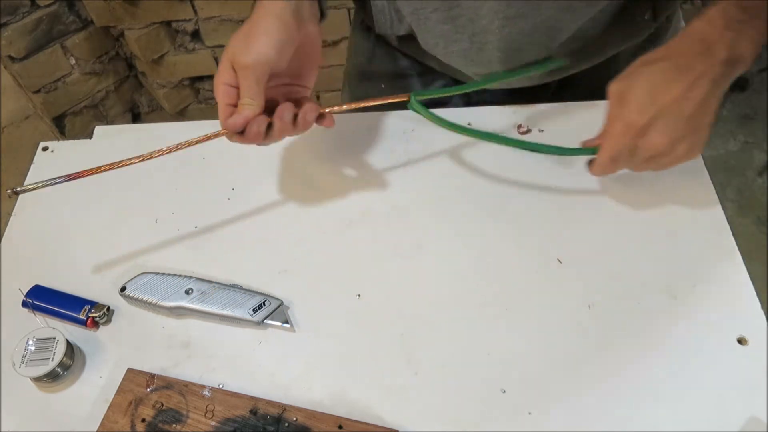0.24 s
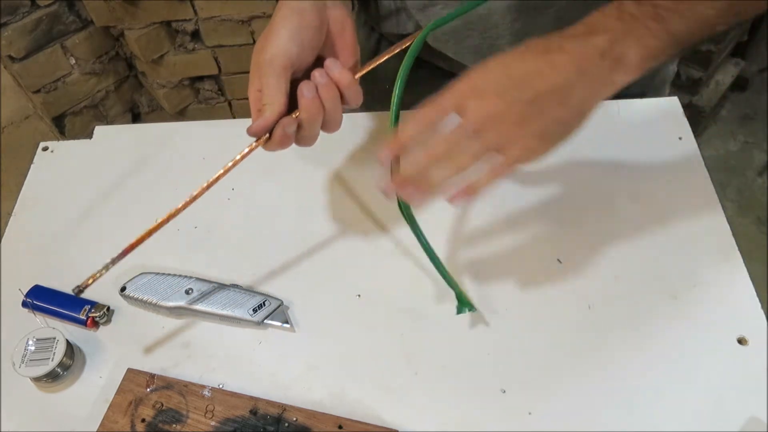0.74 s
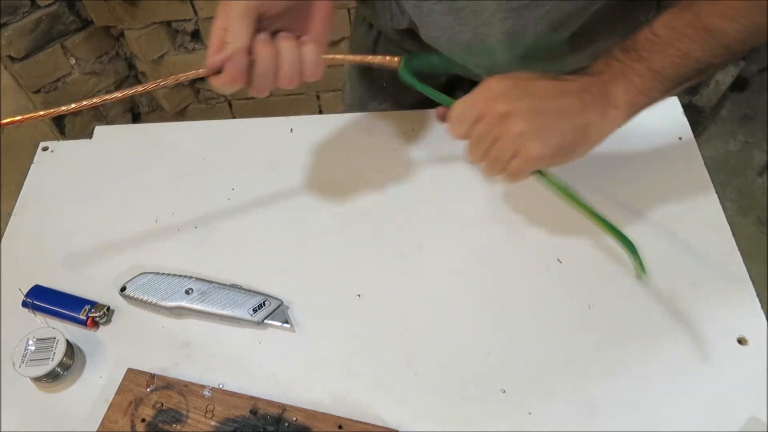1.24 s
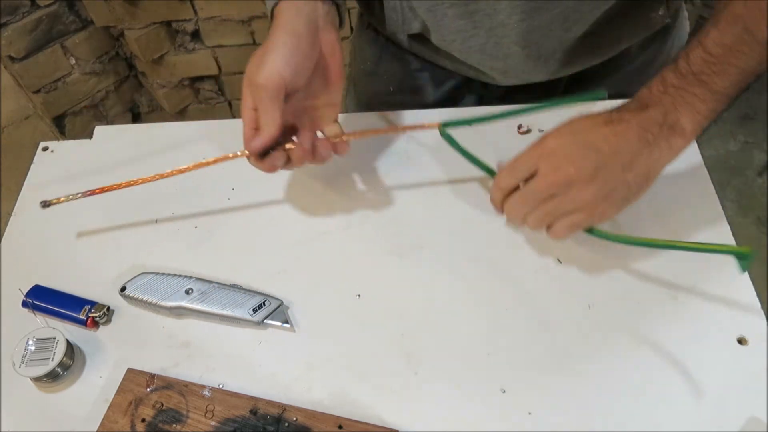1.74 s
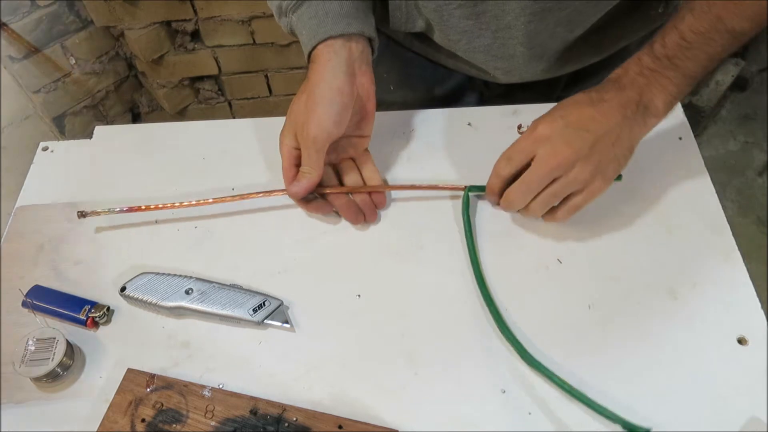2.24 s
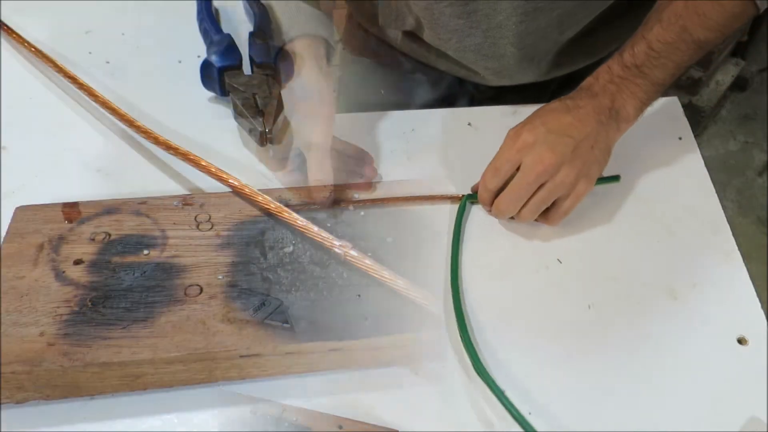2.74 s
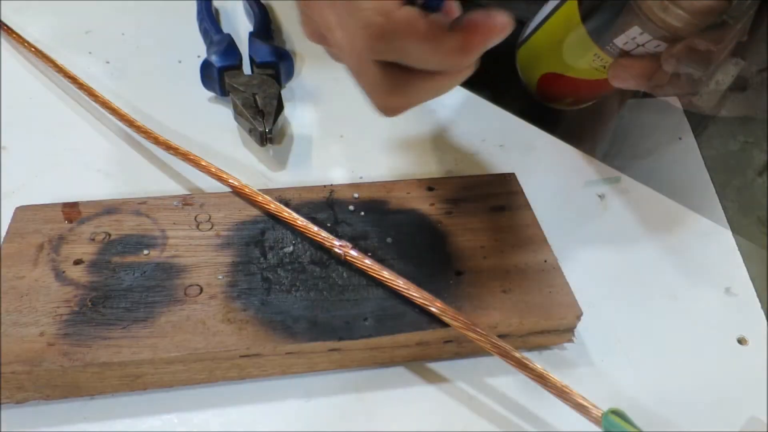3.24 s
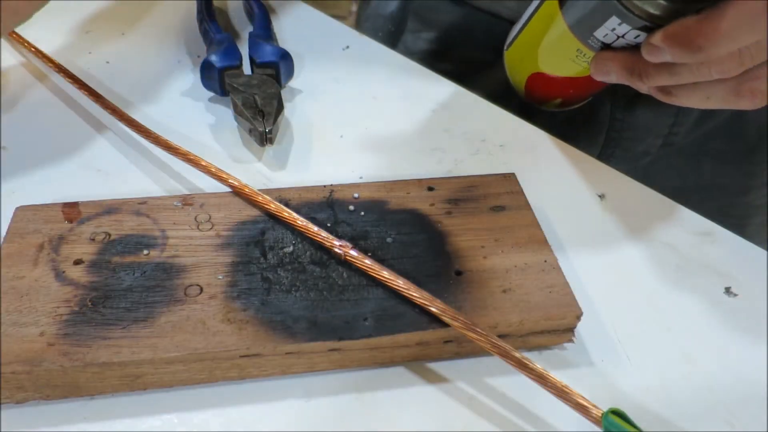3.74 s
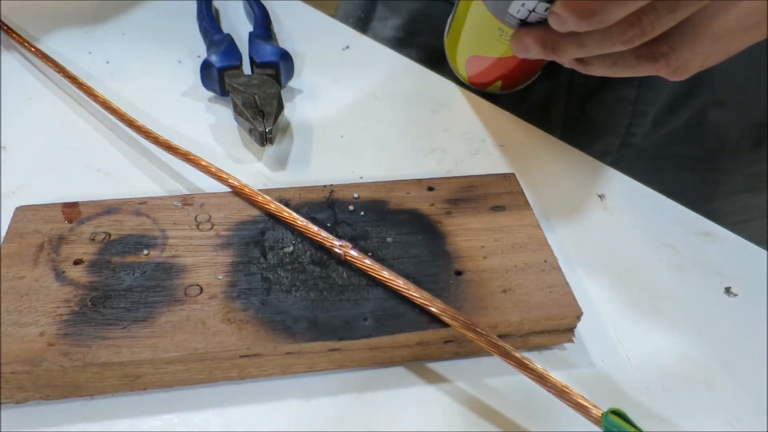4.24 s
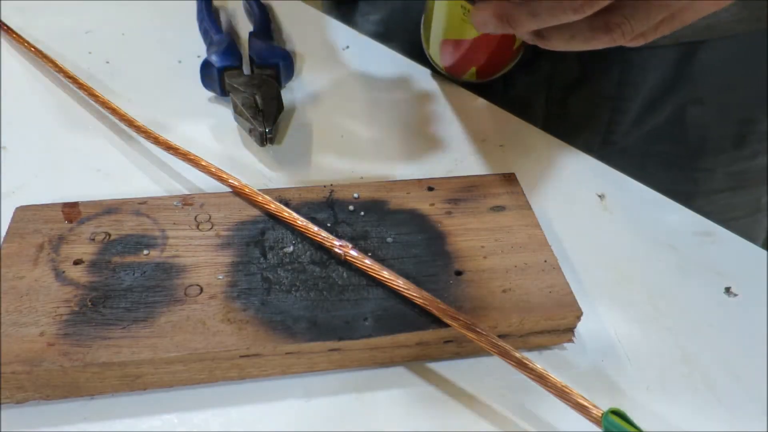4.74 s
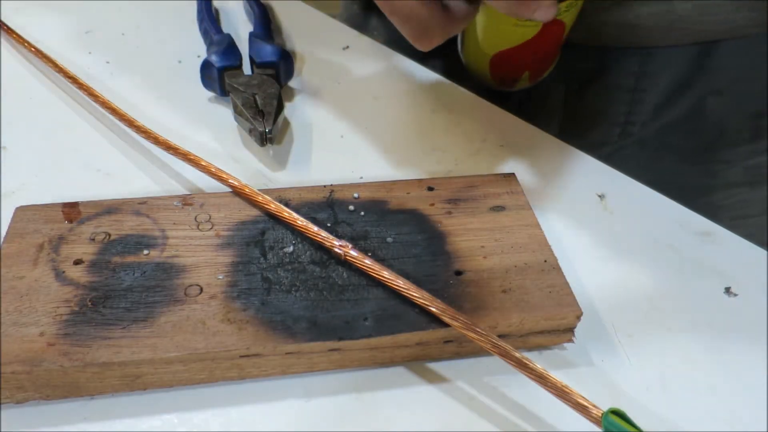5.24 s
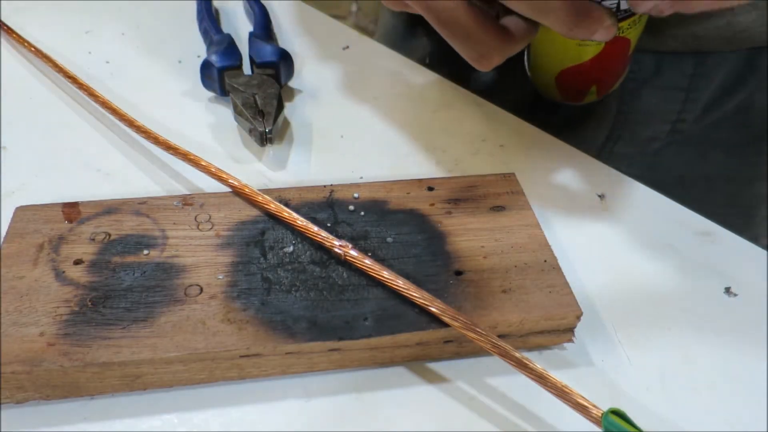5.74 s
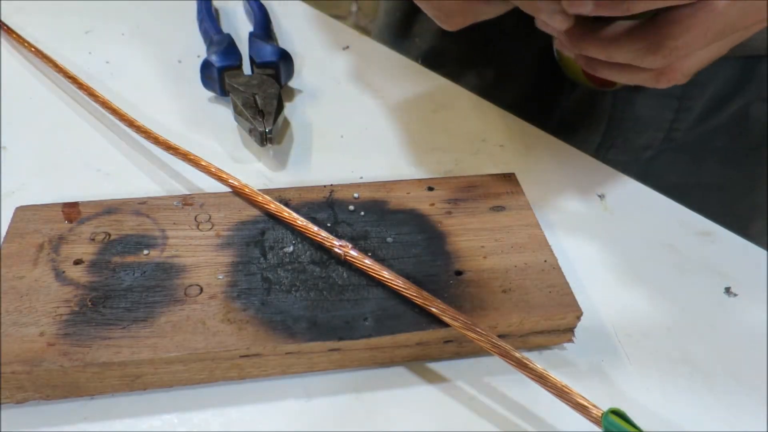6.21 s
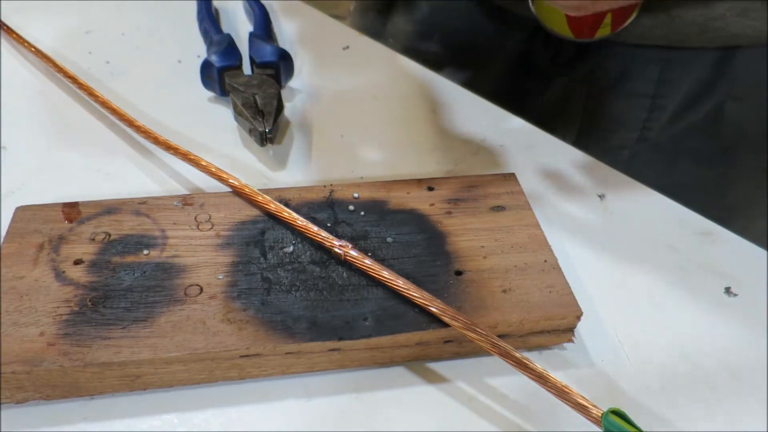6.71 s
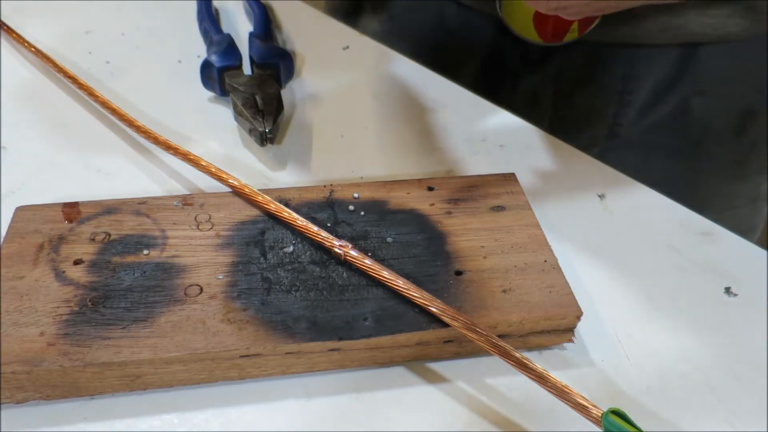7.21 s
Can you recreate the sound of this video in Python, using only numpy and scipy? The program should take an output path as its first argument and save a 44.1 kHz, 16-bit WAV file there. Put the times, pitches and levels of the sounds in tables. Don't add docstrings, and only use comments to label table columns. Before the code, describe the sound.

Plastic sheath cracks and snaps off copper cable, then a valve clicks, a flint wheel rasps, and a small gas torch roars steadily.

```python
import sys
import numpy as np
from scipy import signal
from scipy.fft import rfft, irfft, next_fast_len
from scipy.io import wavfile
from scipy.ndimage import map_coordinates

SR = 44100
rng = np.random.default_rng(int(sys.argv[2]) if len(sys.argv) > 2 else 0)


def invert_db(level):
    return 10 ** (np.asarray(level, dtype=float) / 20)


def unload_audio(sound):
    columns = np.transpose(np.atleast_2d(sound))
    steps = np.round(np.clip(columns, -1, 1) * 32767)
    wavfile.write(sys.argv[1], SR, steps.astype(np.int16))


N = 329427
T = np.arange(N) / SR
PAD = next_fast_len(N + SR // 4)
HZ = np.maximum(np.arange(PAD // 2 + 1) * SR / PAD, 1)


def rms_one(x):
    return x / np.sqrt(np.mean(x ** 2) + 1e-20)


def at_hz(points):
    hz, db = np.array(points).T
    return np.interp(np.log(HZ), np.log(hz), db)


def faded_gain(rows, fade_s):
    s, db = np.transpose(rows)
    gate = np.clip(np.minimum(T - s[0], s[-1] - T) / fade_s + 1, 0, 1)
    return gate * invert_db(np.interp(T, s, db))


def opens(s, fade_s):
    return np.clip((T - s) / fade_s + 1, 0, 1)


def filtered(x, order, hz, kind):
    return signal.sosfilt(signal.butter(order, hz, kind, fs=SR, output="sos"), x)


def colour(x, db):
    cepstrum = irfft(db * np.log(10) / 20, PAD)
    cepstrum[1:PAD // 2] *= 2
    cepstrum[PAD // 2 + 1:] = 0
    return irfft(rfft(x, PAD) * np.exp(rfft(cepstrum)), PAD)[..., :N]


def lifts(peaks):
    return sum(db / (1 + (2 * (HZ - hz) / width) ** 2) for hz, width, db in peaks)


def drift(rate_hz):
    r = np.exp(-2 * np.pi * rate_hz / SR)
    return rms_one(signal.lfilter([1], [1, -2 * r, r * r], rng.standard_normal(N + SR))[SR:])


def grains(per_s, spread_db):
    born = rng.random(N) < per_s / SR
    pulses = born * invert_db(spread_db * np.minimum(rng.exponential(1, N), 4))
    return pulses - pulses.mean()


def lean_in(x, samples):
    turn = np.exp(1j * np.pi * samples * HZ / SR * np.array([[1], [-1]]))
    return irfft(rfft(x, PAD) * turn, PAD)[:, :N]


# f/Hz, level/dB
PORT_WIDTH = [(25, -27), (60, -18), (110, -17), (200, -7), (380, -8), (700, -10), (1290, -13.5),
              (2380, -20.5), (4400, -17.5), (8120, -16.5), (15000, -14)]


def spread(mid, side, wide_db):
    side = colour(side, at_hz(PORT_WIDTH) + wide_db)
    return np.array([mid + side, mid - side])


def hiss(db, wide_db, flicker_db, rate_hz):
    shapes = invert_db(np.array([db, db + at_hz(PORT_WIDTH) + wide_db]))
    mid, side = irfft(rfft(rng.standard_normal((2, PAD))) * shapes, PAD)[:, :N]
    return rms_one(np.array([mid + side, mid - side]) * invert_db(flicker_db * drift(rate_hz)))


def clicks(events, spectrum, t60_s, room_db, ring_db, sharpness, wide, echo_s, echo_db, edge=3.03, hold_s=0):
    dry, wet, t = np.zeros((2, N)), np.zeros(N), np.arange(2000) / SR
    body = colour(np.eye(1, N)[0], at_hz(spectrum))[:600]
    lag = int(echo_s * SR)
    t60s = np.broadcast_to(t60_s, len(events))
    rooms_db = np.broadcast_to(room_db, len(events))
    for (s, db, hz, pan_db, *_), t60, wet_db in zip(events, t60s, rooms_db):
        crack = rng.standard_normal((2, len(t)))
        crack[:, 0] += edge
        burst = crack * invert_db(-60 * np.maximum(t - hold_s, 0) / t60)
        burst[:, lag:] += invert_db(echo_db) * crack[::-1, lag:] * invert_db(-60 * t[:-lag] / t60)
        ringing = signal.lfilter(*signal.iirpeak(min(hz, 15000), sharpness, fs=SR), burst)
        mid, side = signal.fftconvolve(burst + invert_db(ring_db) * ringing, body[None])[:, :len(t)]
        size = invert_db(db) / np.abs(mid).max()
        pan = invert_db(np.array([[pan_db / 2], [-pan_db / 2]]))
        i = round((s + 0.0007) * SR)
        dry[:, i:i + len(t)] += size * (mid + wide * side * [[1], [-1]]) * pan
        same_energy = np.linalg.norm(mid) / np.linalg.norm(body)
        wet[i:i + len(body)] += size * invert_db(wet_db) * body * same_energy
    return dry, wet


# t/s, depth/dB, sink time/s
DUCKS = [
    (-0.3, 9, .01),
    (0.12, 20.5, 0.2),
    (1.304, 21, 0.019),
    (3.951, 13, .005),
    (3.984, 27.5, 0.0056),
]
GAIN_HOLD_S, GAIN_RECOVERY_S = 0.14, 1.03
OVERSHOOT_DB, OVERSHOOT_S = 4, 0.025


def gain_control():
    pulls = []
    for s, depth_db, sink_s in DUCKS:
        since = np.maximum(T - s - sink_s, 0)
        settled = depth_db * np.exp(-np.maximum(since - GAIN_HOLD_S, 0) / GAIN_RECOVERY_S)
        overshoot = OVERSHOOT_DB * np.exp(-since / OVERSHOOT_S)
        pulls.append(np.clip((T - s) / sink_s, 0, 1) * (settled + overshoot))
    return -np.max(pulls, axis=0)


# f/Hz, level/dB per Hz
AIR_COLOUR = [(18, -45), (30, -19), (93, -6), (179, -11), (280, -9.5), (364, -10), (415, -12),
              (1010, -14.5), (2230, -15.5), (16000, -28.5)]
AIR_DB = -41


def air():
    return invert_db(AIR_DB + gain_control()) * hiss(at_hz(AIR_COLOUR), wide_db=13.5, flicker_db=0.68, rate_hz=9.6)


# f/Hz, level/dB
ROOM_COLOUR = [(150, -3), (800, -12.5), (2500, -2), (5000, -1.5), (9000, -6), (16000, -9.5)]
# f/Hz, t60/s
ROOM_T60_S = [(300, 0.29), (3000, 0.29), (5000, 0.29), (8000, 0.25), (15000, 0.24)]
TAIL_CUT_S, TAIL_CUT_DB = 4.006, -16


def room(x):
    t, edges = np.arange(SR // 2) / SR, 100 * 2.0 ** np.arange(8.5)
    tail = 0
    for low, high in zip(edges, np.minimum(edges[1:], 19000)):
        t60 = np.interp(np.sqrt(low * high), *np.transpose(ROOM_T60_S))
        band = filtered(rng.standard_normal((2, len(t))), 2, [low, high], "band")
        tail = tail + band * invert_db(-60 * t / t60)
    tail = (tail + 0.3 * tail[::-1]) * np.minimum(t / 0.0037, 1) / np.sqrt(SR / 40)
    level = invert_db(0.5 + TAIL_CUT_DB * opens(TAIL_CUT_S + 0.0053, 0.013))
    return level * colour(signal.fftconvolve(x[None], tail)[:, :N], at_hz(ROOM_COLOUR))


# t/s, level/dB
RUB = [
    [(0.125, -41), (0.19, -31)],
    [(0.205, -41.5), (0.3, -45.5)],
]
# f/Hz, level/dB per Hz
RUB_COLOUR = [(120, -40.5), (200, -20), (538, -7), (1160, -10), (1910, 4.5), (3370, -5.5), (5840, 3),
              (6760, -5), (12400, -4), (16000, -16)]


def rub():
    friction = hiss(at_hz(RUB_COLOUR), wide_db=2.0, flicker_db=2.5, rate_hz=900)
    return faded_gain(np.vstack(RUB), 0.0055) * friction


# t/s, peak level/dB, ring f/Hz, pan/dB
JOLTS = [(0.1176, -29, 1500, -1), (0.1345, -32, 1100, -1), (0.1535, -31, 900, 1), (0.161, -25, 1500, -1),
         (0.1735, -29, 1600, -1), (0.196, -30, 900, -1), (0.2305, -34, 500, -1), (0.251, -37, 1500, -2),
         (0.2715, -37, 1500, 1), (0.31, -40, 1500, -3)]
# f/Hz, level/dB per Hz
JOLT_COLOUR = [(150, -12), (400, -6), (1500, -1.5), (2500, 5.5), (5000, -30), (16000, -60)]


def jolts():
    return clicks(JOLTS, JOLT_COLOUR, t60_s=0.0033, room_db=-13, ring_db=6.0, sharpness=0.82, wide=0.1,
                  echo_s=0.003, echo_db=-20)


# t/s, peak level/dB, ring f/Hz, pan/dB
SLIPS = [(0.1176, -5.5, 5840, -3), (0.1338, -18.5, 11600, 1), (0.1525, -6, 5170, -7.5),
         (0.161, -11, 4440, 0.5), (0.1721, -5, 5830, -4), (0.196, 0.5, 10800, 1), (0.2136, -6, 4590, -1.5),
         (0.2304, -4.5, 9200, -1.5), (0.2506, -3.5, 5140, -2.5), (0.2708, -9, 10800, -0.2),
         (0.2744, -13.5, 5030, -2), (0.285, -10.5, 8570, -10.5), (0.31, -9.5, 8550, 3)]
# f/Hz, level/dB per Hz
SLIP_COLOUR = [(120, -54.5), (200, -37), (1200, -20.5), (1970, -11.5), (3000, -14), (4100, -4.5),
               (5250, -1), (6320, -3.5), (12500, -3), (16500, -25)]
SLIP_ROOM_DB, SLIP_ROOM_DB_PER_S = -14, 39


def slips():
    since_s = np.array(SLIPS)[:, 0] - SLIPS[0][0]
    return clicks(SLIPS, SLIP_COLOUR, t60_s=0.0051, room_db=SLIP_ROOM_DB + SLIP_ROOM_DB_PER_S * since_s,
                  ring_db=2.5, sharpness=2.2, wide=0.22, echo_s=0.003, echo_db=-21.0)


# t/s, peak level/dB, ring f/Hz, pan/dB
TEAR = [
    (1.3013, 2.5, 4390, -1.5),
]
# f/Hz, level/dB per Hz
TEAR_COLOUR = [(120, -65), (200, -44), (1050, -8), (1580, -13.5), (2090, -4.5), (4530, -3), (7190, 0),
               (7740, -6), (11000, 0), (13200, -10.5), (14800, -15.5), (16500, -43)]


def tear():
    return clicks(TEAR, TEAR_COLOUR, t60_s=0.006, room_db=-14.5, ring_db=3.0, sharpness=1.3, wide=0.25,
                  echo_s=0.0077, echo_db=-29.0, edge=2.9, hold_s=0.00073)


# t/s, peak level/dB, ring f/Hz, pan/dB
TICKS = [(1.053, -43, 1950, 0), (2.4097, -15.5, 1484, -1), (2.843, -12, 2900, -3), (4.0436, -30.5, 2900, 0),
         (4.0813, -29, 1540, 2), (4.135, -39, 2270, -2.5), (4.7045, -39.5, 2350, 4),
         (4.7266, -42.5, 2850, 8), (6.3038, -23, 2280, 0.5), (7.2664, -18.5, 2370, -2)]
# f/Hz, level/dB per Hz
TICK_COLOUR = [(300, -30), (1500, -8), (4000, -8), (6000, -22), (12000, -27), (16000, -38)]


def ticks():
    return clicks(TICKS, TICK_COLOUR, t60_s=0.0027, room_db=-11.5, ring_db=12.0, sharpness=5.1, wide=0.28,
                  echo_s=0.0015, echo_db=-28, edge=1.1, hold_s=0.00054)


# t/s, peak level/dB, ring f/Hz, pan/dB
SNICKS = [(0.815, -38, 12200, -4), (1.052, -42, 12200, -7.5), (2.4095, -19, 3800, -3),
          (2.4942, -38, 14000, -3), (2.8285, -27, 6590, 1), (2.8414, -21, 6710, -1.07),
          (3.8102, -22, 6040, -1), (3.9066, -28.5, 6410, -1), (4.0436, -38.5, 8050, 2),
          (4.0821, -31, 6200, -1), (4.114, -32, 7790, 0), (4.1324, -37, 7780, -1.72),
          (4.1484, -43, 9070, -2), (4.1694, -52.5, 6240, 0.13), (5.2244, -33, 7170, -3),
          (6.3035, -27.5, 6000, -1.85), (6.4834, -34.5, 6370, 9.5), (6.6005, -29, 7090, -3),
          (7.2994, -31.5, 10200, -1)]
# f/Hz, level/dB per Hz
SNICK_COLOUR = [(1500, -20), (5000, -6.5), (8000, -6), (13000, -5), (16500, -19.5)]


def snicks():
    return clicks(SNICKS, SNICK_COLOUR, t60_s=0.007, room_db=-6.5, ring_db=5.0, sharpness=4.0, wide=0.65,
                  echo_s=0.0025, echo_db=-9.5)


# t/s, peak level/dB, ring f/Hz, pan/dB
KNOCKS = [
    (1.992, -42, 277, -7.5),
    (2.139, -25, 985, -2),
    (2.409, -4.5, 1200, -3),
]
# f/Hz, level/dB per Hz
BENCH = [(59, -59), (100, -20), (236, -2), (574, -16), (927, -4), (1080, 0.5), (1240, -3), (1840, -16),
         (2970, -22), (4190, -43), (6000, -26), (7800, -52), (13200, -120)]


def knocks():
    return clicks(KNOCKS, BENCH, t60_s=0.0094, room_db=-0.86, ring_db=17.0, sharpness=2.1, wide=0.11,
                  echo_s=0.0043, echo_db=-9.0, edge=12.0)


# t/s, peak level/dB, ring f/Hz, pan/dB, t60/s
SNAPS = [
    (2.1388, -10, 6400, -2.5, 0.0092),
    (3.9505, -3, 4480, 5, 0.0066),
    (3.9796, -24, 2550, 21, 0.018),
    (3.9838, 1.5, 3120, -5, 0.0063),
]
# f/Hz, level/dB per Hz
SNAP_COLOUR = [(120, -32), (200, -10.5), (1030, -9), (3700, -13.5), (5980, -15.5), (11600, -10.5),
               (13500, -14.5), (14800, -9.5), (16500, -32)]


def snaps():
    dry, wet = clicks(SNAPS, SNAP_COLOUR, t60_s=np.array(SNAPS)[:, -1], room_db=-8.5, ring_db=13.5,
                      sharpness=2.0, wide=0.12, echo_s=0.0058, echo_db=-24.5, edge=3.5, hold_s=0.0007)
    return lean_in(dry, 1.0), wet


# t/s, peak level/dB, f/Hz, t60/s
RINGS = [(1.3022, -10, 3670, .022), (1.302, -20, 1150, .008), (1.302, -23, 5000, .02),
         (3.9513, -8, 4700, .012), (4.082, -40, 1400, 0.023), (2.8445, -24, 2760, 0.099),
         (3.9525, -13, 2700, .012), (3.9512, -11, 3750, .01)]


def rings():
    out = np.zeros(N)
    for s, db, hz, t60 in RINGS:
        age = np.maximum(T - s, 0)
        out += invert_db(db - 60 * age / t60) * np.sin(2 * np.pi * hz * age)
    return out


# t/s, level/dB
FLINT = [
    [(2.535, -49), (2.553, -39), (2.57, -17.5)],
    [(2.58, -21.5), (2.622, -44)],
]
# f/Hz, level/dB per Hz
FLINT_COLOUR = [(590, -59.5), (1000, -38.5), (1210, -19.5), (2000, -23), (3050, -10.5), (3510, -22),
                (4040, -11.5), (5290, -6.5), (5880, -12), (9960, -15.5), (13200, -6), (15700, -16),
                (16500, -44)]
# f/Hz, width/Hz, level/dB (replaced by an equal lift)
FLINT_RINGS = [(5550, 79, -5), (7250, 51, -9), (10800, 38, -10), (12200, 68, -2), (12800, 62, 0),
               (13800, 102, -3)]
# f/Hz, level/dB
FLINT_WIDTH = [(60, -1), (240, -2), (950, -15), (3770, -38.5), (15000, -8)]


def flint():
    teeth_hz = 230 * invert_db(2.5 * drift(73))
    bite = invert_db(1.5 * np.cos(2 * np.pi * np.cumsum(teeth_hz) / SR))
    chips = grains(6000, spread_db=3.5) * rng.choice([-1, 1], N)
    tone_db = at_hz(FLINT_COLOUR) + lifts([(hz, width, 6.0) for hz, width, _ in FLINT_RINGS])
    mid = colour(chips * bite, tone_db)
    side = colour(np.roll(chips, 900) * bite, tone_db + at_hz(FLINT_WIDTH))
    sparks = faded_gain(np.vstack(FLINT), 0.009) * rms_one(np.array([mid + side, mid - side]))
    return sparks, invert_db(-31) * sparks.mean(axis=0)


# t/s, peak level/dB, ring f/Hz, pan/dB
TEETH = [(2.5655, -14, 11900, 0), (2.5688, -8.5, 12800, -1), (2.5713, -10, 13200, 1.5),
         (2.5738, -9, 12900, -2), (2.5748, -10, 13500, -2), (2.577, -9, 13200, -2), (2.5783, -22, 13500, 0),
         (2.5845, -14, 13400, 0), (2.5878, -16.5, 13500, -2)]


def teeth():
    return clicks(TEETH, FLINT_COLOUR, t60_s=0.0025, room_db=-29, ring_db=10.5, sharpness=6.9, wide=0.35,
                  echo_s=0.0012, echo_db=-9, edge=2.2)


# t/s, peak level/dB, ring f/Hz, pan/dB
SPITS = [(2.7874, -34, 6900, 0), (3.9348, -24, 5170, 0), (4.728, -35, 5000, 0), (4.8489, -40, 5270, 0),
         (4.93, -37, 4000, 0), (5.06, -34, 7930, 0), (5.8206, -29.5, 5630, 0), (6.5203, -37, 12000, 0),
         (6.593, -29, 12000, 0), (6.5975, -28, 9000, 0), (6.655, -29, 12000, 0), (6.968, -31, 9000, 0)]


def spits():
    return clicks(SPITS, SNICK_COLOUR, t60_s=0.004, room_db=-14, ring_db=-1.0, sharpness=2.5, wide=0.4,
                  echo_s=0.0025, echo_db=-15)


# t/s, peak level/dB, puff length/ms
IGNITION = [(2.5945, -17, 1.9), (2.6022, -14.5, 1.2), (2.6051, -15, 0.83), (2.609, -14.5, 0.87),
            (2.6124, -14, 1.05), (2.8701, -19, 0.71), (2.8777, -17, 0.67), (2.913, -12, 0.42),
            (2.9213, -14, 0.79), (6.45, -22, 0.71), (7.265, -17, 0.58)]


def ignition():
    out, t = np.zeros(N), np.arange(800) / SR
    for s, db, ms in IGNITION:
        age = t * 1000 / ms
        push = 3.05 * age * (1.9 - age) * np.exp(-1.1 * age)
        i = round(s * SR)
        out[i:i + len(t)] += invert_db(db) * push * (1 + 0.83 * rng.standard_normal(len(t)))
    return filtered(out, 2, [70, 4000], "band")


# t/s, flame level/dB, nozzle turn to ports/dB
TORCH = [(2.65, -22.5, 0.5), (3.0, -21.5, 2.5), (3.4, -22.5, -0.5), (3.9, -25, 4), (4.1, -22, 7),
         (4.4, -27.5, 4), (4.76, -23.5, -1), (5.14, -26.5, 1.5), (5.5, -26, 3.3), (5.66, -25.5, 1),
         (5.7, -25.5, 8.5), (5.9, -26.5, 7.5), (5.94, -24.5, -0.5), (6.5, -25, -0.5), (6.6, -22.5, 2.5),
         (6.92, -25, 0.5), (7.12, -23.5, 2.5), (7.47, -24.5, 0)]
# t/s, lift/dB
SURGES = [(2.604, 5), (2.935, 2.5), (3.946, 0), (4.482, 1.5), (5.532, 1), (6.454, 1), (6.965, 3.5),
          (7.32, -0.5)]
SURGE_RISE_S, SURGE_FALL_S = 0.035, 0.014
VALVE_S, LIT_S = 2.144, 2.592


def torch_controls():
    s, flame_db, turn_db = np.transpose(TORCH)
    surge_db = np.zeros(N)
    for at, db in SURGES:
        away = np.where(T < at, (at - T) / SURGE_RISE_S, (T - at) / SURGE_FALL_S)
        surge_db += db * np.exp(-away)
    return np.interp(T, s, flame_db) + gain_control(), np.interp(T, s, turn_db), surge_db


# start t/s, end t/s, centre f/Hz, lift/dB
WHISTLES = [(2.122, 2.6, 9780, 20.5), (2.702, 3.751, 9740, 14), (4.15, 5.05, 9950, 15.5),
            (5.0, 5.5, 10050, 16.5), (5.631, 5.831, 9360, 8), (5.86, 6.08, 9800, 12),
            (6.201, 6.381, 10080, 19), (6.35, 6.47, 10020, 26), (6.5, 6.7, 9435, 21),
            (6.621, 6.862, 9970, 22), (7, 7.6, 9940, 17)]
WHISTLE_DB, WHISTLE_SWELL_S, WHISTLE_WAVER_HZ = -45.5, 0.058, 90


def whistle():
    start, end, hz, lift_db = np.transpose(WHISTLES)[:, :, None]
    swell = np.clip(np.minimum(T - start, end - T) / WHISTLE_SWELL_S, 0, 1)
    swell_db = np.max(lift_db * swell, axis=0)
    centre_hz = np.interp(T, (start + end)[:, 0] / 2, hz[:, 0]) + WHISTLE_WAVER_HZ * drift(4.5)
    phase = 2 * np.pi * np.cumsum(centre_hz) / SR
    slow = filtered(rng.standard_normal((4, N)), 2, 210, "low")
    mid, side = slow[:2] * np.cos(phase) + slow[2:] * np.sin(phase)
    gain = opens(VALVE_S, 0.016) * invert_db(torch_controls()[0] + WHISTLE_DB + swell_db)
    return gain * rms_one(mid + 0.57 * side * [[1], [-1]])


# f/Hz, level/dB per Hz
JET_COLOUR = [(180, -14), (300, -22), (406, -6.5), (513, -6), (923, -9.5), (1150, -6), (1400, -10),
              (1740, -9.5), (3030, -8.5), (3710, -10), (5460, -5), (8160, -12.5), (9980, -11),
              (15400, -22.5), (16500, -41)]
COLD_JET_DB, PUFF_DB, PUFF_S = -38, 12, 0.12
JET_DB = -16.5


def jet():
    flame_db, turn_db, _ = torch_controls()
    puff_db = PUFF_DB * np.exp(-np.maximum(T - VALVE_S, 0) / PUFF_S)
    cold_db = COLD_JET_DB + gain_control() + puff_db
    lit = opens(LIT_S + 0.055, 0.054)
    gain = opens(VALVE_S, 0.0045) * invert_db((1 - lit) * cold_db + lit * (flame_db + JET_DB + turn_db))
    return gain * hiss(at_hz(JET_COLOUR), wide_db=4.5, flicker_db=1.2, rate_hz=23.0)


# f/Hz, level/dB per Hz
ROAR_COLOUR = [(15, -51), (25, -33.5), (103, -12), (141, -3), (244, -5), (281, 3), (437, -5.5), (494, -5),
               (549, -7), (644, -8), (824, -9), (916, -4), (1700, -20.5), (2210, -33), (3740, -120)]
# f/Hz, level/dB per Hz
RUSH_COLOUR = [(650, -26), (1100, -7.5), (1410, 0), (1630, -5), (2670, -5), (3300, -12), (3800, -11),
               (4450, -14.5), (6790, -18), (9000, -27), (11700, -58), (19800, -120)]
# f/Hz, width/Hz, lift/dB
BENCH_AIR = [(153.5, 30, 4), (213.2, 22.5, 9.5), (287, 15, 3), (500, 34, 5.5), (643, 41, 7.5),
             (945, 29, 3.5), (2885, 44, 3.5), (4060, 250, 1.5)]
RUSH_DB, RUSH_LAG_S = -9.5762, 0.0061
RUSH_TURNS, RUSH_SURGES = 0.71, 1.13


def flame():
    lift = lifts(BENCH_AIR)
    flame_db, turn_db, surge_db = torch_controls()
    roar_gain = opens(LIT_S, 0.0035) * invert_db(flame_db + surge_db)
    rush_db = flame_db + RUSH_DB + RUSH_TURNS * turn_db + RUSH_SURGES * surge_db
    rush_gain = opens(LIT_S + RUSH_LAG_S, 0.006) * invert_db(rush_db)
    gust = invert_db(0.9 * drift(30) + 0.6 * drift(9))
    puffs = rms_one(grains(1400, spread_db=1.5)) + 0.48 * rng.standard_normal(N)
    mid, side = colour(np.array([puffs * gust, rng.standard_normal(N)]), at_hz(ROAR_COLOUR) + lift)
    mid, side = np.array([mid, side]) / mid.std()
    crests = filtered(mid ** 2 - 1, 2, 110, "high")
    roar = rms_one(spread(mid + 0.0079 * crests, side, wide_db=-18.0))
    rush = hiss(at_hz(RUSH_COLOUR) + lift, wide_db=-5.0, flicker_db=2.26, rate_hz=390) * gust ** 0.85
    return roar_gain * roar, rush_gain * rush


# t/s, bench delay/ms, hand delay/ms
ECHOES = [(2.2, 1.4, 0.81), (2.6, 0.984, 0.66), (3.6, 0.9855, 0.9), (4.0, 1.19, 0.81), (4.6, 1.01, .67),
          (5.3, 0.9, 0.57), (5.6, 1.187, 0.56), (6.3, 1.07, 0.58), (6.52, 0.93, 0.59), (6.9, 0.815, 0.574),
          (7.1, 1.0825, 0.46)]


def reflected(x, bench_db, hand_db):
    s, *delays_ms = np.transpose(ECHOES)
    out = x.copy()
    for delay_ms, db in zip(delays_ms, (bench_db, hand_db)):
        delay = np.interp(T, s, delay_ms) * (1 + 0.054 * drift(5.1)) * SR / 1000
        read = np.arange(N) - delay
        out = out + invert_db(db) * np.array([map_coordinates(channel, [read], order=3) for channel in x])
    return out


# start t/s, end t/s, f/Hz, width/Hz, lift/dB
SHADES = [(2.6, 3.0, 6500, 500, 3), (3.2, 3.55, 3680, 250, 3), (2.85, 3.5, 6200, 400, -0.5),
          (4, 3.92, 7800, 400, 5.5), (2.9, 3.4, 3500, 360, -1.5), (2.3, 3.85, 8350, 850, -3),
          (2.3, 4.9, 10600, 990, -3), (4.7, 5.0, 2970, 250, 2), (2.9, 5.2, 7600, 700, 0),
          (3.9, 6.8, 7100, 500, -3), (4.3, 5.2, 3500, 300, 1.5), (6, 4.3, 5500, 300, 1.5),
          (4.2, 5.9, 5240, 320, 0.5), (5.2, 5.7, 6800, 400, 1), (5.7, 8.8, 7100, 370, -1),
          (5.55, 6.2, 6400, 300, 1), (5, 6.5, 2520, 250, -9), (5.1, 5.6, 2700, 180, -8),
          (5.6, 5.92, 2850, 180, 1.5), (5.5, 6.3, 2300, 220, 4), (5.95, 6.52, 1100, 790, -2.5),
          (4.9, 6.5, 890, 56, -7), (6.53, 7.6, 930, 120, 2.5), (6.5, 6.7, 1880, 390, -1),
          (6.53, 6.87, 7150, 360, 3.5), (6.6, 6.9, 7700, 400, 3), (6.83, 7.1, 6600, 400, 2.5),
          (9, 8.4, 7100, 400, 6), (9.7, 9, 7600, 400, 7), (6.58, 7.8, 3530, 240, 2),
          (8.6, 7.6, 3600, 300, 3), (7.05, 7.6, 5400, 400, 3.5), (7.6, 7.45, 9000, 600, -4),
          (7.8, 7.3, 5050, 300, -5), (5.26, 5.45, 9500, 5000, -1.5), (7.6, 6.98, 11000, 6000, -5),
          (4.1, 4.26, 160, 100, 5), (3.12, 3.45, 145, 50, -6.5), (4.3, 4.8, 100, 100, 6)]
SHADE_FADE_S = 0.042


def shaded(x):
    out = x.copy()
    for start, end, hz, width, lift_db in SHADES:
        span = slice(round(start * SR), round(end * SR))
        fade = np.clip(np.minimum(T[span] - start, end - T[span]) / SHADE_FADE_S, 0, 1)
        band = signal.lfilter(*signal.iirpeak(hz, hz / width, fs=SR), out[:, span])
        out[:, span] += (invert_db(1.55 * lift_db) - 1) * fade * band
    return out


def torch():
    roar, rush = flame()
    combed = invert_db(-0.7) * reflected(rush + jet(), bench_db=-14.5, hand_db=-22.5)
    return lean_in(ignition() + whistle() + shaded(roar + combed), 0.122)


def scene():
    struck = [jolts(), slips(), tear(), ticks(), snicks(), knocks(), snaps(), flint(), teeth(), spits()]
    direct = sum(pair[0] for pair in struck) + rings()
    room_feed = sum(pair[1] for pair in struck)
    return air() + room(room_feed) + rub() + direct + torch()


def top_cut(x):
    return signal.sosfilt(signal.cheby2(12, 70, 16900, fs=SR, output="sos"), x)


def roll_off(x):
    return signal.sosfilt(signal.butter(12, 16550, fs=SR, output="sos"), x)


# f/Hz, level/dB
LEAN = [(60, -2.1), (110, 0), (200, -1.5), (380, -1.5), (700, -1.0), (1290, -0.5), (2380, -0.5),
        (4400, 0.0), (8120, -0.5), (15000, 0.5)]


def record(dry):
    lean_db = at_hz(LEAN) / 2
    ports = np.array([colour(dry[0], lean_db), colour(dry[1], -lean_db)])
    mix = top_cut(0.55 * np.tanh(ports / 0.58))
    return roll_off(mix)


dry = scene()
out = record(dry)
unload_audio(out)
```